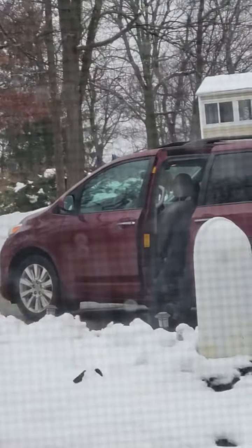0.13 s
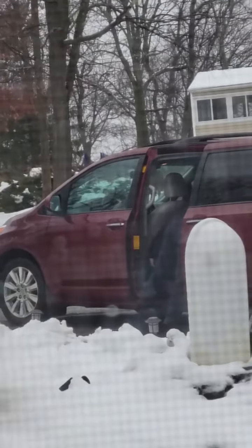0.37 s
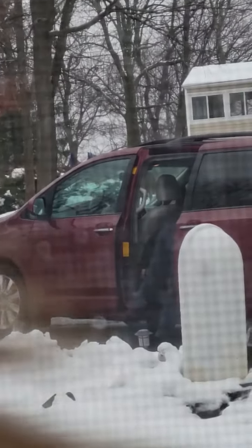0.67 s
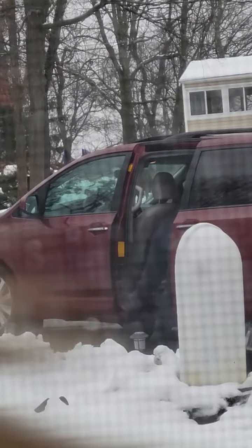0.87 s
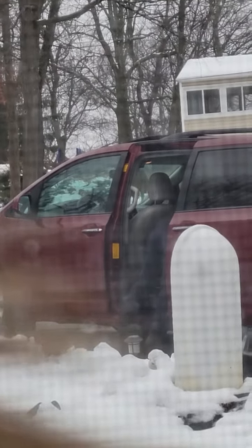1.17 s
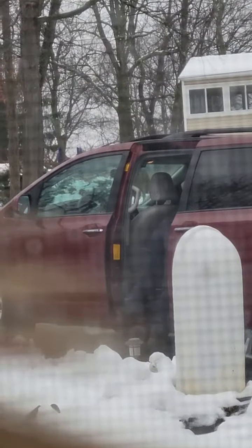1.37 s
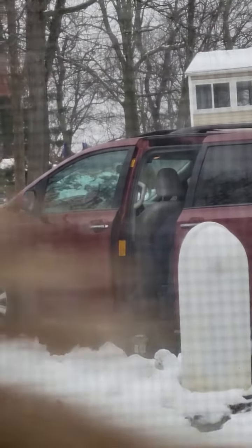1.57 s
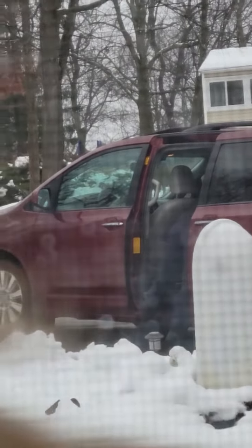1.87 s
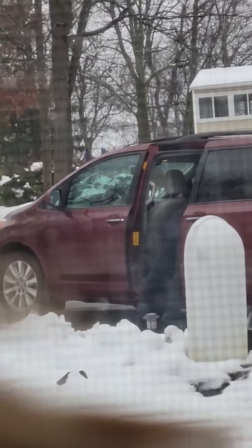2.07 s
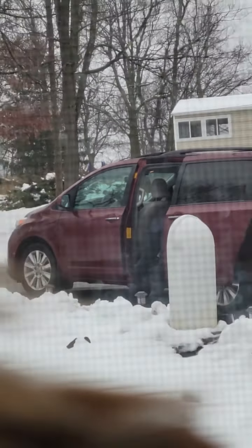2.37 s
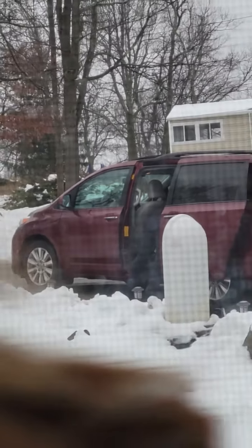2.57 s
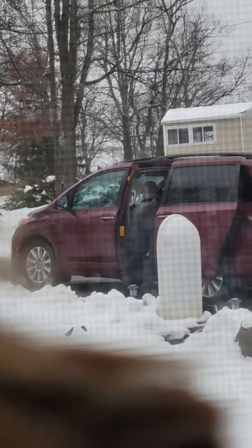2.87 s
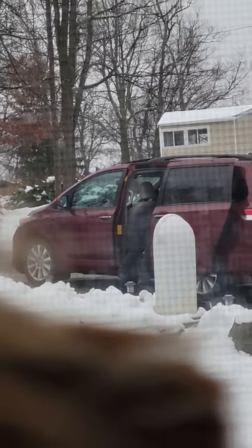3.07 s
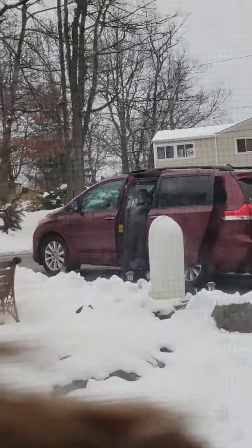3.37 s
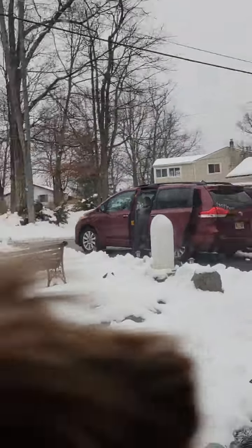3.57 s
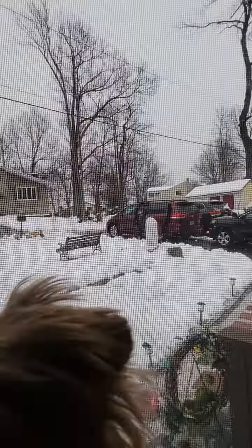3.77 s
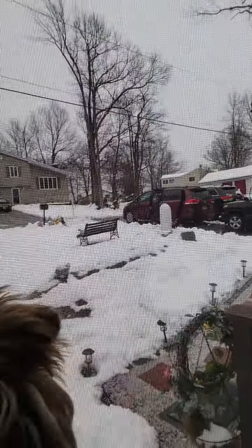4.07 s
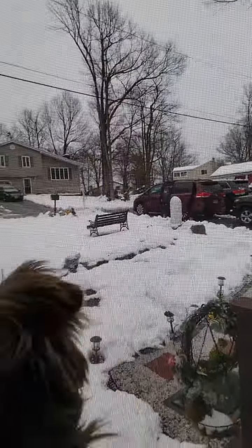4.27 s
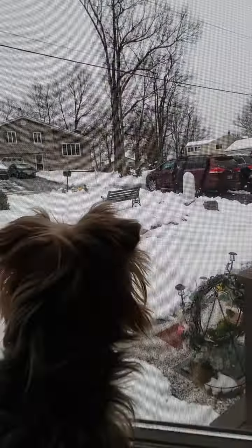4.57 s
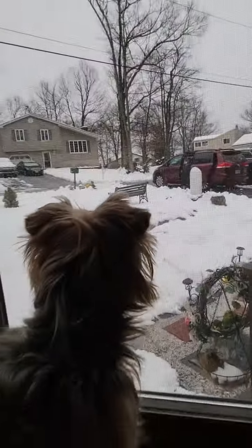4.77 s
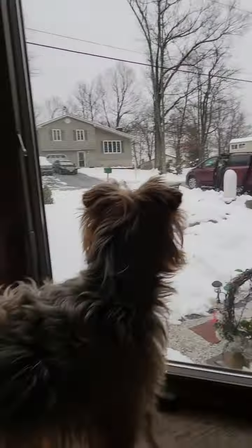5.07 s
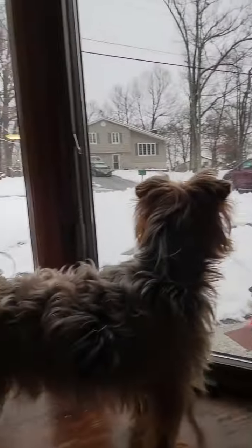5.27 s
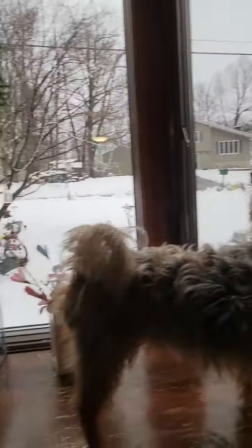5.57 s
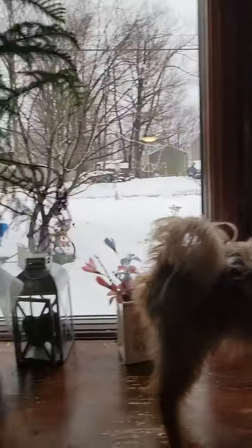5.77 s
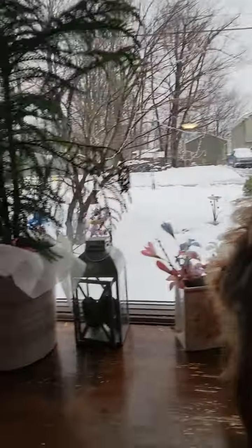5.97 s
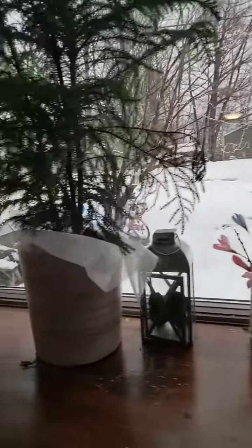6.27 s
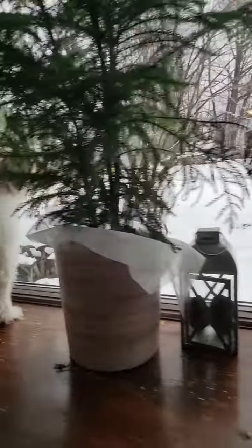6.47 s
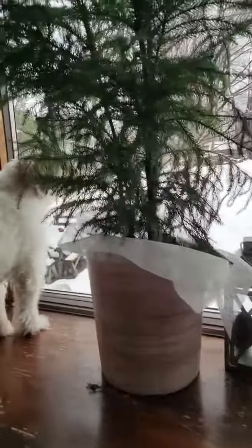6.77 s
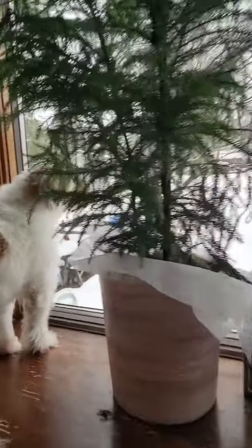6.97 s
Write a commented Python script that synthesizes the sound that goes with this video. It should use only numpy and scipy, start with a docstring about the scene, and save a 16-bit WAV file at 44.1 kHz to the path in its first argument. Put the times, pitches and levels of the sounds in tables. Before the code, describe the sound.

A small dog whines, then fires off quick high-pitched yipping barks in bunches at a window, ending with a growl, a low woof and a huff.

```python
"""Two small dogs bark, yip and whine at a window in a bare living room, close to two microphones.
Harmonic voices make the barks, whines and grumbles; pushed ones add jitter, breath and an unrelated squeal.
Noise bursts make the cracks, throbbing noise the growl, throat-filtered pulses a last low woof, noise a huff.
Echoes and a noise tail make the hard room ring after each call; decaying low sines make two soft steps.
A faint, mostly low room noise lies beneath."""
import sys
import numpy as np
from scipy import signal
from scipy.fft import rfft, irfft, next_fast_len
from scipy.io import wavfile
from scipy.ndimage import uniform_filter1d, minimum_filter1d, map_coordinates

SR = 44100
rng = np.random.default_rng(int(sys.argv[2]) if len(sys.argv) > 2 else 0)


def pcm_store(signal):
    """Save signal as 16-bit PCM."""
    levels = np.round(np.clip(np.atleast_2d(signal), -1, 1) * 32767)
    wavfile.write(sys.argv[1], SR, levels.astype(np.int16).T)


N = 314433
TOP_HZ = 15730  # band limit of the whole scene

# Second oscillator of a strained voice: (start [s], length [s], first pitch [Hz], middle pitch [Hz],
# last pitch [Hz], level [dB], octave level [dB])
SQUEAL_ARCHES = [ (0.459, 0.059, 962, 878.4, 652, -24, -37.5), (2.306, 0.065, 943, 892, 625, -22, -39.5),
                 (2.808, 0.076, 861, 1042, 1091, -12, -19), (3.151, .075, 1012, 1025, 951, -12.5, -28.5),
                 (3.399, 0.1, 838, 1034, 845, -9.5, -23), (3.967, 0.083, 747, 773.6, 762, -10, -26),
                 (4.206, 0.036, 900, 811, 650, -22, -52), (4.667, 0.061, 997, 864.4, 737, -12.5, -25),
                 (5.205, .068, 900, 1089, 925, -12.5, -25.5), (5.341, 0.1, 796, 773, 715, -20, -28.5),
                 (5.993, 0.052, 835, 795, 890, -11.5, -26.5), (6.077, .05, 938, 806, 717, -12.5, -24), ]


def amp(db):
    """Decibels to a linear factor."""
    return 10 ** (np.asarray(db) / 20)


def unit(x):
    """Scale a signal to rms 1."""
    return x / np.sqrt(np.mean(x ** 2) + 1e-20)


def along(points, hz):
    """Read (frequency [Hz], value) points on a log frequency axis."""
    f, v = np.transpose(points)
    return np.interp(np.log(hz + 1), np.log(f + 1), v)


def controls(rows, fade=.008):
    """Sample indices of a table's span, a soft gate over it and each column per sample."""
    s, *columns = np.transpose(rows)
    first = max(int((s[0] - fade) * SR), 0)
    last = min(int((s[-1] + fade) * SR), N)
    at = np.arange(first, last)
    t = at / SR
    gate = np.clip(np.minimum(t - s[0], s[-1] - t) / fade + 1, 0, 1)
    return at, gate, [np.interp(t, s, column) for column in columns]


def wobble(rate, at):
    """A smooth random curve with rate knots a second."""
    knots = rng.standard_normal(8192)
    return map_coordinates(knots, [at * rate / SR], mode="wrap")


def filtered(x, response):
    """Multiply the spectrum of x by a response of frequency."""
    m = next_fast_len(N + 8192)
    return irfft(rfft(x, m) * response(np.fft.rfftfreq(m, 1 / SR)), m)[..., :N]


def noise(spectrum, alike=0):
    """Coloured stereo noise of rms 1; alike is the share common to both sides."""
    a, b = filtered(rng.standard_normal((2, N)), lambda hz: amp(along(spectrum, hz)))
    turn = np.arccos(np.clip(alike, 0, 1)) / 2
    return unit(np.cos(turn) * a + np.sin(turn) * np.array([b, -b]))


def cycles(hz, rough, at, jitter, jitter_rate):
    """Phase of an oscillator whose period scatters more as it gets rough."""
    glide = uniform_filter1d(hz, size=500, mode="nearest")
    scattered_hz = glide * (1 + jitter * rough * wobble(jitter_rate, at))
    return 2 * np.pi * np.cumsum(scattered_hz) / SR


def partial(phase, ports):
    """A sine of rms 1 that reaches the two microphones out of step."""
    return np.sqrt(2) * np.cos(phase + np.array([ports, -ports]) / 2)


def port_phase(at, hz):
    """The phase between the two microphones grows in proportion to the pitch."""
    # Phase between the microphones at 620 Hz: (time [s], phase [rad])
    phase_points = [(.2, 1.03), (1.2, 0.5), (1.72, 2), (1.9, 0.81), (2.2, 1.1), (3.15, 1.17), (3.8, 2.23),
                    (4.6, 2.57), (5.2, 1.2), (5.35, 1.88), (5.7, 0.89), (6.03, 2.86)]
    return np.interp(at / SR, *np.transpose(phase_points)) * hz / 620


def blend(tone, hiss, share):
    """Trade tone for noise at constant power."""
    share = np.clip(share, 0, .95)
    return np.sqrt(1 - share) * tone + np.sqrt(share) * hiss


def voices():
    """Vocal folds: clean harmonics when steady; jitter, a half-pitch flutter and air puffs when rough."""
    # The barks; one with next to no fall runs on into a whine: (start [s], rise [s], fall [s],
    # first pitch [Hz], top pitch [Hz], bend of the rise [1 straight, 3 quick], fundamental [dB],
    # octave [dB], mouth overtones [dB], rasp [dB], extra level at the end of the fall [dB],
    # roughness rising [0-1], roughness falling [0-1])
    bark_rows = [ (1.172, 0.086, 0.051, 343.2, 889, 1.35, -9.5, -9.5, -22, -26.5, -3.5, 0.51, .55),
                 (1.382, 0.092, 0.094, 235.4, 659, 2.26, -10, -9, -2, -30.5, 4, 0.039, .15),
                 (1.599, 0.11, 0.0027, 248.2, 669, 2.93, -10, -11, -11, -32, 0, 0.017, .08),
                 (2.642, 0.091, 0.053, 293.3, 549, 2.58, -11.5, -19, -17, -38, 11, 0.034, .12),
                 (2.776, .072, 0.099, 388.6, 847.4, 2.11, -4, -17, -11, -14.5, -26.5, 0.32, .3),
                 (3.097, 0.073, 0.12, 462, 855.5, 3.65, -5.5, -16.5, -15, -22, -14.5, .15, .3),
                 (3.38, 0.069, 0.15, 245.5, 817.6, 2.97, -4, -21, -12, -20, -13, 0.52, 0.35),
                 (3.642, 0.092, 0.0028, 265.6, 676, 3, -8, -6, -18, -28, 0, 0.082, .04),
                 (3.95, 0.064, 0.15, 460.5, 580.3, 3.06, -16, -8, -27, -26, -12, 0.3, .35),
                 (4.57, .115, .085, 289.8, 599, 3.1, -9.5, -14.5, -11.5, -30, -7.5, 0.032, 0.53),
                 (5.138, 0.11, 0.058, 300.7, 812.5, 2.95, -5, -19.5, -30, -22, -17.5, 0.33, .35),
                 (5.29, 0.092, .11, 420.7, 649.3, 2, -12, -11.5, -14.5, -27, -3.5, .35, .2),
                 (5.612, .1, 0.12, 284.5, 640, 3, -11.5, -11, -13, -27, -1, 0.061, .4),
                 (5.882, 0.13, 0.098, 254, 625.6, 2.52, -12.5, -10.5, -15, -25, -1.5, 0.088, .4),
                 (6.06, 0.044, 0.054, 370.7, 506, 2.9, -40, -16.5, -21.5, -32.5, 3, 0.66, .7), ]
    # The wavering whines, one table each: (time [s], pitch [Hz], fundamental [dB], octave [dB],
    # mouth overtones [dB], rasp [dB])
    whine_tables = [
        [(0, 538.4, -13, -20, -26, -34.5), (.03, 598.2, -14, -4.5, -23.5, -36),
         (.08, 647.2, -8.5, -20.5, -20.5, -31), (.15, 584.4, -26.5, -16.5, -33, -45.5),
         (.205, 621.3, -15.5, -45.5, -35, -44), (.25, 645, -13, -19.5, -24, -38),
         (.32, 583.8, -30.5, -33.5, -40.5, -46.5), (.43, 622.2, -20.5, -28.5, -26, -42.5),
         (.51, 611, -49, -46, -35, -59.5)],
        [(1.73, 676.7, -6.5, -56, -17, -38), (1.79, 630, -8, -43, -27.5, -39),
         (1.86, 678.3, -5.5, -28, -18.5, -35.5), (1.91, 659, -12, -41, -23, -43.5),
         (1.97, 596.6, -25, -34.5, -35, -49), (2.05, 657.5, -8.5, -26.5, -30, -44.5),
         (2.11, 610, -21, -37, -30, -49.5), (2.17, 566.3, -30, -34, -38, -53),
         (2.3, 631.7, -16.5, -38, -29.5, -45), (2.35, 609, -33, -67, -30, -55)],
        [(3.765, 675, -4.5, -22, -22.5, -35.5), (3.82, 582.5, -14, -26.5, -36.5, -35),
         (3.87, 621.8, -3.5, -24, -36.5, -42.5), (3.915, 654.7, -3.5, -28.5, -22.5, -30.5),
         (3.97, 636, -1, -16.5, -19, -35.5)],
        [(4.08, 581.4, -19, -34, -33, -50), (4.15, 626.3, -2.5, -19.5, -26, -35.5),
         (4.2, 578.3, -39.5, -37.5, -42.5, -41.5), (4.24, 469, -22, -54, -36, -60.5)],
    ]
    # Voices running down: (start [s], length [s], first pitch [Hz], last pitch [Hz], level [dB])
    grumble_rows = [(.545, 0.27, 446.3, 128.6, -30), (2.396, .165, 404.3, 185, -26),
                    (2.779, 0.072, 277.3, 143.7, -29), (3.247, 0.0615, 421, 209, -48),
                    (4.256, .15, 385, 190.8, -26.5)]
    # Resonance curve of the mouth: (frequency [Hz], relative level [dB])
    mouth_curve = [(200, -75.5), (1100, -39), (1550, 1.5), (1800, -0.5), (2100, 13.5), (2550, 0.5),
                   (2850, -7), (3250, -3.5), (3800, -18.5), (4400, -40), (5200, -40.5), (6500, -72.5)]
    # Resonance curve of the high rasp: (frequency [Hz], relative level [dB])
    rasp_curve = [(300, -54), (2500, -24), (3750, -4), (4300, -4.5), (5000, -0.5), (6400, 2), (7100, -7),
                  (8200, 1.5), (9800, -8), (10700, -16), (12300, 3.5), (14500, -8.5), (15800, -2)]
    throat_curve = [(40, -53), (200, -22.0), (450, -42), (750, 7.5), (1250, 17.5), (1550, 0.5),
                    (1900, -12), (2300, -10.5), (3500, -5), (5500, -31.0)]  # (Hz, relative dB)
    throat_breath, rasp_breath = .6, .14  # air against tone: amplitude factor, power share when clean
    opening_octaves_per_db = .004

    out = np.zeros((2, N))
    mouth_air, rasp_air, throat_air = noise(mouth_curve), noise(rasp_curve), noise(throat_curve)
    calls = [bark(*row) for row in bark_rows]
    calls += [whine(rows) for rows in whine_tables]
    calls += [grumble(*row) for row in grumble_rows]
    for at, gate, hz, (first_db, octave_db, mouth_db, rasp_db), rough in calls:
        rough = np.clip(rough, 0, 1)
        ports = port_phase(at, hz)
        # a strained voice slips between pitches
        hz = hz * (1 + .05 * rough * np.tanh(2 * wobble(80, at)))
        phase = cycles(hz, rough + 0.028, at, jitter=0.082, jitter_rate=300)
        puffs = unit(1 + .5 * np.cos(phase))  # air comes once a cycle

        low = amp(first_db) * partial(phase, ports)
        low += amp(octave_db) * partial(2 * phase, -ports)
        low_size = np.hypot(amp(first_db), amp(octave_db))
        low += throat_breath * rough * low_size * puffs * throat_air[:, at]

        # a wider mouth is louder and resonates higher
        opening = 2 ** (opening_octaves_per_db * (mouth_db + 10.0))
        mouth_tone = overtones(phase, hz, mouth_curve, opening, flicker_db=7.5, count=20)
        mouth = blend(mouth_tone, puffs * mouth_air[:, at], rough)

        rasp_tone = overtones(phase, hz, rasp_curve, np.ones(len(at)), flicker_db=8, count=40)
        rasp = blend(rasp_tone, puffs * rasp_air[:, at], rasp_breath + 0.7 * rough)

        flutter = amp(12 * rough * np.tanh(wobble(220, at)))  # up to 12 dB either way
        flutter *= 1 + 0.29 * rough * np.cos(phase / 2)  # every other cycle is stronger
        low_gain = amp(-1.0 - 1.5 * takeover(at))  # the low layer gives way to a squeal by 1.5 dB
        layers = low_gain * low + amp(mouth_db - 4.5) * mouth + amp(rasp_db - 1.5) * rasp
        out[:, at] += gate * flutter * layers
    return out


def bark(start, rise, fall, first_hz, top_hz, bend, first_db, octave_db, mouth_db, rasp_db,
         tail_db, rough_up, rough_down):
    """One push of breath: pitch and loudness climb together, then sag, each layer on its own curve."""
    # Swell of the fundamental, octave, mouth overtones and rasp, in that order: (depth of the attack
    # [dB], stage at which the fade begins [share of the rise], depth of the release [dB])
    layer_swells = [ (20.5, 0.44, 21), (29.8, 0.6, 22.5), (48, 0.58, 47), (43, 0.93, 34), ]
    sag_hz = 259  # a bark with a full fall sinks to this pitch
    attack_curve, release_curve = 1.375, 1.235
    slack_rough = 0.13  # the folds are a little rougher before they come up to pitch

    end = 2 if fall > .02 else 1
    # stage runs 0-1 through the rise and 1-2 through the fall
    at, gate, (stage,) = controls([(start, 0), (start + rise, 1), (start + rise + fall, end)])
    slack = np.clip(1 - stage, 0, 1) ** bend
    sag = np.sin(np.pi / 2 * np.clip(stage - 1, 0, 1) ** 1.15) ** 2
    hz = top_hz + (first_hz - top_hz) * slack + (sag_hz - top_hz) * sag
    levels = []
    for db, (attack_db, hold, release_db) in zip((first_db, octave_db, mouth_db, rasp_db), layer_swells):
        attack = attack_db * slack ** attack_curve
        release = release_db * np.clip((stage - hold) / (2 - hold), 0, 1) ** release_curve
        levels.append(db - attack - release + tail_db * sag)
    rough = np.interp(stage, [.9, 1.25], [rough_up, rough_down]) + slack_rough * slack
    return at, gate, hz, levels, rough


def whine(rows):
    """A held, nearly clean note whose pitch and layers waver together."""
    at, gate, (hz, *levels) = controls(rows)
    return at, gate, hz, levels, 0.021  # roughness


def grumble(start, length, first_hz, last_hz, db):
    """As the breath gives out the folds slacken: their period grows while the dull tone fades."""
    # Offsets of the fundamental, octave, mouth overtones and rasp, in that order: [dB]
    layer_offsets = [1.5, -3, -58, -44]
    fade_db, rough = 12.5, 0.041
    at, gate, (share,) = controls([(start, 0), (start + length, 1)], fade=.015)
    period = 1 / first_hz + (1 / last_hz - 1 / first_hz) * share ** .9
    levels = [db + layer_db - fade_db * share ** 2 for layer_db in layer_offsets]
    return at, gate, 1 / period, levels, rough


def overtones(phase, hz, spectrum, stretch, flicker_db, count):
    """Harmonics from the third up share constant power under a resonance curve; each flickers alone."""
    step = 32  # gains are updated every 32 samples
    k = np.arange(3, 3 + count)[:, None]
    lines = k * hz[::step]
    knots = rng.standard_normal((count, 256))
    knot_times = np.arange(0, len(hz), step) / SR * 14  # 14 knots a second
    grid = np.meshgrid(np.arange(count), knot_times, indexing="ij")
    drift = map_coordinates(knots, grid, mode="wrap")
    gain = amp(along(spectrum, lines / stretch[::step]) + flicker_db * drift) * (lines < TOP_HZ)
    gain = np.repeat(gain / np.linalg.norm(gain, axis=0), step, axis=1)[:, :len(hz)]
    # each harmonic reaches the two microphones about a quarter cycle apart
    ports = rng.choice([-1, 1], size=count) * 1.44
    offsets = np.exp(1j * (2 * np.pi * rng.random(count) + np.array([ports, -ports]) / 2))
    angle = (k * (phase % (2 * np.pi))).astype(np.float32)
    in_phase = offsets.real @ (gain * np.cos(angle))
    quadrature = offsets.imag @ (gain * np.sin(angle))
    return np.sqrt(2) * (in_phase - quadrature)


def takeover(at):
    """How fully a squeal sounds at each sample, 0-1."""
    return sum(np.interp((at / SR - start) / length, [0, .25, .7, 1], [0, 1, 1, 0])
               for start, length, *_ in SQUEAL_ARCHES)


def squeals():
    """A strained voice gains a second, unsteady oscillator, in one short curve of pitch."""
    attack_db, peak_share, release_db = 1.5, 0.66, 4
    out = np.zeros((2, N))
    for start, length, first_hz, middle_hz, last_hz, db, octave_db in SQUEAL_ARCHES:
        at, gate, (share,) = controls([(start, 0), (start + length, 1)], fade=0.004084)
        hz = np.polyval(np.polyfit([0, .5, 1], [first_hz, middle_hz, last_hz], 2), share)
        swell_db = np.interp(share, [0, peak_share, 1], [-attack_db, 0, -release_db])
        phase = cycles(hz, 0.95, at, jitter=.026, jitter_rate=320)
        ports = 0.54 * port_phase(at, hz)
        tone = amp(db) * partial(phase, ports) + amp(octave_db) * partial(2 * phase, -ports)
        out[:, at] += gate * amp(swell_db + 2.44 * wobble(200, at)) * tone
    return out


def breaks():
    """Where the voice cracks, the folds flap at random: a short, decaying burst of coloured noise."""
    # Cracks of the voice: (time [s], level [dB])
    cracks = [(.458, -21.5), (1.486, -21), (1.722, -14), (2.304, -27), (3.76, -18), (4.67, -16.5),
              (5.336, 4), (6.084, -17.5), (4.211, -30.5)]
    crack_curve = [(300, -41.5), (700, 15.5), (950, 10.5), (1300, 5.0), (1600, -45), (2000, -16.0),
                   (2900, -21.0), (9000, -32.5)]  # (Hz, relative dB)
    t60, onset = .09, 0.0022  # s
    level, t = np.zeros(N), np.arange(SR // 10) / SR
    for s, db in cracks:
        level[round(s * SR):][:len(t)] += amp(db - 60 * t / t60) * (1 - np.exp(-t / onset))
    return level * noise(crack_curve, alike=0.24)


def woof():
    """Separate pulses from a nearly closed mouth ring the throat; the lips part near the end."""
    # The last low woof: (time [s], pitch [Hz], level [dB], brightness against the body [dB])
    woof_rows = [(6.741, 109.4, -21.5, -28.5), (6.753, 192.7, -14.5, -18.5), (6.77, 227.4, -8, -37.5),
                 (6.788, 247.4, -19.5, -1), (6.805, 227, -13, -9), (6.82, 175.4, -14.5, -24),
                 (6.845, 123.6, -31, 13.5)]
    # Throat resonances: (frequency [Hz], width [Hz], level [dB])
    resonances = [(180, 110, -8), (432, 31, -1), (719, 130, 3), (1435, 130, -0.5), (2530, 210, -4),
                  (3350, 710, -17), (5440, 1600, -15.5)]
    at, gate, (hz, db, bright_db) = controls(woof_rows, fade=0.0011)
    pulses = np.zeros(N)
    phase = cycles(hz, 0.83, at, jitter=0.027, jitter_rate=220)
    pulses[at] = np.diff(phase // (2 * np.pi), prepend=-1)  # one click a cycle
    pulses[at] += .015 * rng.standard_normal(len(at))  # a little breath

    def throat(f):
        """Parallel resonators of alternating sign."""
        return sum((-1) ** k * amp(g) * 1j * f * width / (centre ** 2 - f * f + 1j * f * width)
                   for k, (centre, width, g) in enumerate(resonances))

    ring = filtered(pulses, lambda f: throat(f) / (1 + (f / 7500) ** 3))
    body = filtered(ring, lambda f: 1 / (1 + (f / 1050) ** 8))
    bright = ring - body
    out = np.zeros(N)
    out[at] = gate * amp(db) * (unit(body[at]) + amp(bright_db) * unit(bright[at]))
    # the dog stands to one side, so the left microphone hears it later and weaker
    return filtered(out, lambda f: np.array([amp(-6) * np.exp(-2j * np.pi * f * .0005), np.ones(len(f))]))


def moan():
    """The other dog hums low with its mouth shut: a single wavering sine."""
    # The hum: (time [s], pitch [Hz], level [dB])
    hum_rows = [(3.8, 229.6, -57.5), (4.0, 223.6, -45), (4.22, 247, -55)]
    out = np.zeros((2, N))
    at, gate, (hz, db) = controls(hum_rows, fade=0.017)
    phase = cycles(hz, 0.87, at, jitter=0.0085, jitter_rate=9.5)
    out[:, at] = gate * amp(db) * partial(phase, port_phase(at, hz))
    return out


def growl():
    """A low rattle in the chest: noise throbbing about twenty times a second."""
    # Two growls, one table each, before a 5.5 dB trim: (time [s], level [dB])
    growl_tables = [
        [(0.98, -59), (1.018, -51), (1.17, -29.5)],
        [(6.15, -32), (6.702, -45), (6.72, -43)],
    ]
    # Colour of the chest: (frequency [Hz], relative level [dB])
    chest_curve = [(80, -20.5), (180, -9.5), (340, 8), (450, -12.5), (900, -39.5)]
    out, chest = np.zeros((2, N)), noise(chest_curve, alike=0.74)
    for rows in growl_tables:
        at, gate, (db,) = controls(rows, fade=0.055)
        phase = cycles(np.full(len(at), 22.), 0.4, at, jitter=0.067, jitter_rate=18)
        throb = unit(1 + .9 * np.cos(phase))
        out[:, at] += gate * amp(db - 5.5) * throb * chest[:, at]
    return out


def huff():
    """The dog blows air through its nose after the last woof: a short swell of noise."""
    # The breath, before a 1 dB trim: (time [s], level [dB])
    breath_rows = [(6.85, -40), (6.908, -35), (6.98, -57)]
    # Colour of the nose: (frequency [Hz], relative level [dB])
    nose_curve = [(700, -10.5), (1450, 3.5), (1900, -5.5), (2400, -10.5), (7000, -26), (14000, -45)]
    out = np.zeros((2, N))
    at, gate, (db,) = controls(breath_rows, fade=.025)
    out[:, at] = gate * amp(db - 1.0) * noise(nose_curve, alike=0.1)[:, at]
    return out


def room(x, early_db, tail_db):
    """Window, sill and floor answer within 25 ms; a diffuse tail follows, its top treble dying first."""
    # Time to decay by 60 dB: (frequency [Hz], time [s])
    decay_times = [(150, 0.67), (400, 0.49), (1040, 0.64), (2760, 0.75), (7280, 0.47), (14000, 0.18)]
    # Colour of the tail: (frequency [Hz], relative level [dB])
    tail_colour = [(150, -0.5), (1000, 1.5), (2000, -2.5), (3000, -3), (14000, 4.5)]
    hz, t, z = signal.stft(rng.standard_normal((2, SR)), SR, nperseg=256)
    decay = amp(along(tail_colour, hz)[:, None] - 60 * t / along(decay_times, hz)[:, None])
    build_up = 1 - np.exp(-t / 0.025)
    tail = signal.istft(z * decay * build_up, SR, nperseg=256)[1]
    answer = amp(tail_db) * tail / np.linalg.norm(tail[0])
    for side in answer:
        echoes = (rng.uniform(.003, .025, size=8) * SR).astype(int)
        side[echoes] += amp(early_db) * rng.choice([-1, 1], size=8)
    return signal.fftconvolve(x, answer, axes=1)[:, :N]


def paws():
    """Each padded step is one low push on the wooden sill: a decaying 85 Hz sine."""
    # Soft steps: (time [s], level [dB])
    steps = [(4.868, -38), (6.534, -34.5)]
    out, t = np.zeros(N), np.arange(SR // 5) / SR
    for s, db in steps:
        envelope = amp(db - 60 * t / 0.15) * (1 - np.exp(-t / 0.0013))
        out[round(s * SR):][:len(t)] += envelope * np.sin(2 * np.pi * 85 * t)
    return out


def background():
    """Faint, mostly low room noise that wavers a little."""
    # Colour of the room noise: (frequency [Hz], relative level [dB])
    air_curve = [(15, -46), (60, -6), (130, -13), (600, -24), (1500, -37.5), (15000, -41)]
    return amp(-57 + 0.83 * wobble(33, np.arange(N))) * noise(air_curve, alike=.85)


def scene():
    """The dogs and their room answer pass through the room's colour; steps and room noise join."""
    # The room's colour at the microphones, from standing waves: (frequency [Hz], level [dB])
    room_modes = [(25, -6.5), (60, 1), (110, 4), (170, 2.5), (270, 1), (365, -4), (480, 0), (600, -1.5),
                  (1000, 0), (1300, 3.5), (1500, -4), (2000, 2), (2600, -5), (3200, -0.5)]
    dogs = voices() + squeals() + breaks() + moan() + growl() + huff()
    near = woof()  # close to the microphones, so less of it comes back from the room
    heard = dogs + near + room(dogs + amp(-10) * near, early_db=-12.5, tail_db=-12.0)
    coloured = filtered(heard, lambda hz: amp(along(room_modes, hz)))
    return coloured + paws() + background()


def record(dry):
    """A fast limiter holds peaks at full scale, then everything above the band limit is cut."""
    needed = 1 / np.maximum(np.abs(dry).max(axis=0), 1)
    gain = uniform_filter1d(minimum_filter1d(needed, size=441), size=441)
    return filtered(dry * gain, lambda hz: hz < TOP_HZ)


dry = scene()
out = record(dry)
pcm_store(out)
```